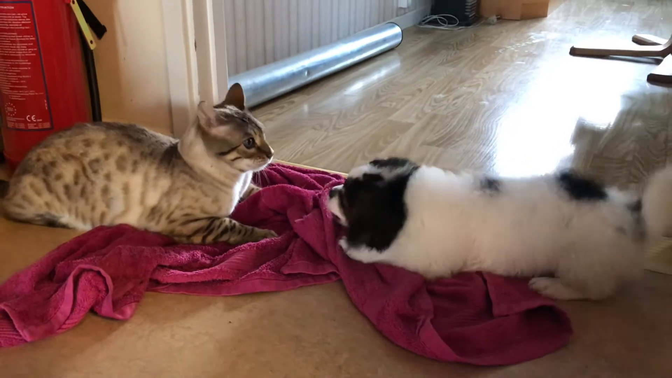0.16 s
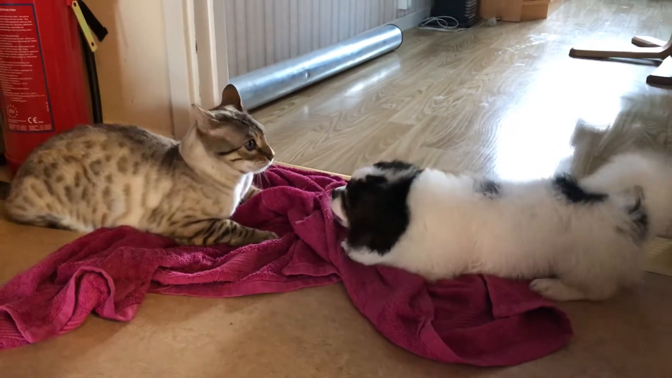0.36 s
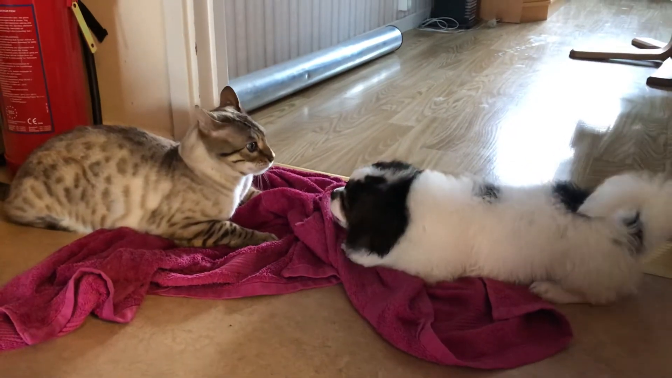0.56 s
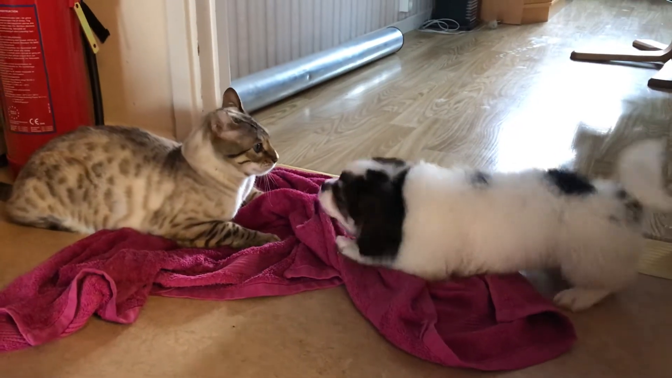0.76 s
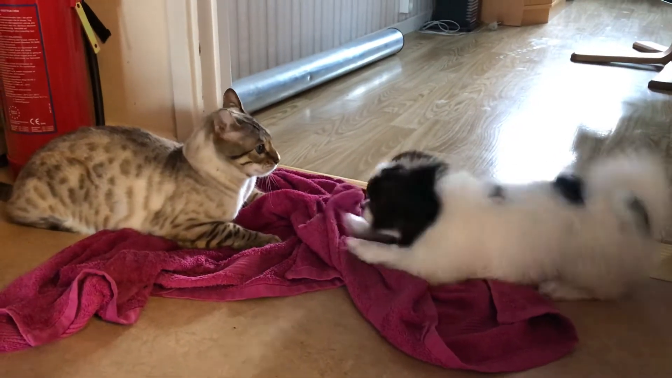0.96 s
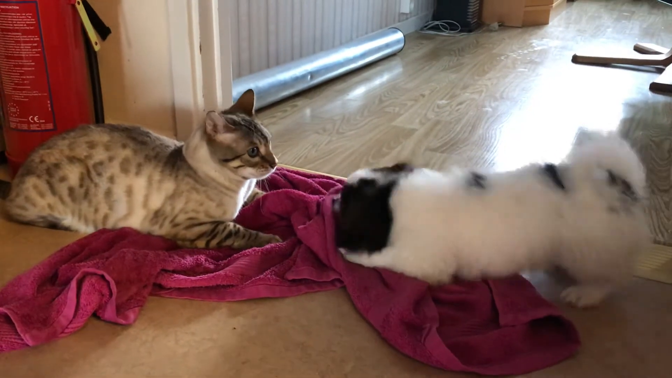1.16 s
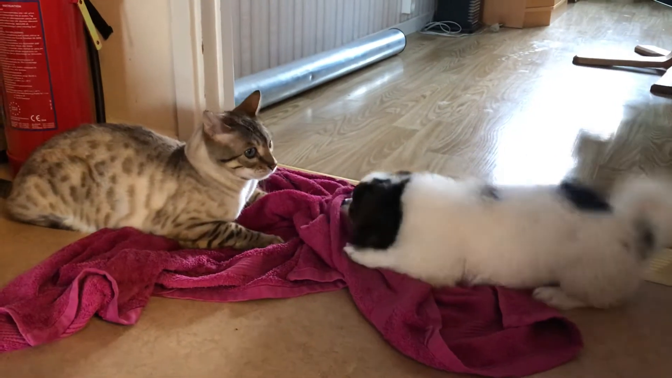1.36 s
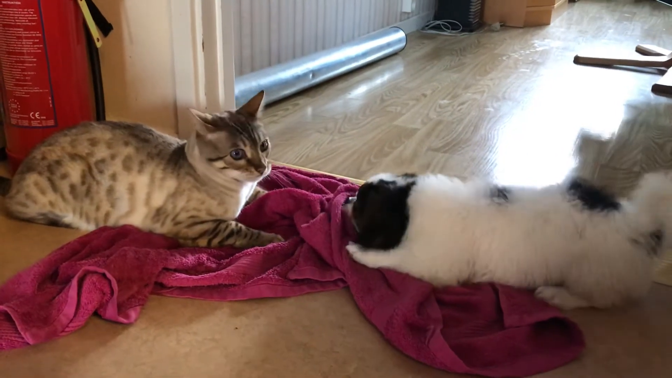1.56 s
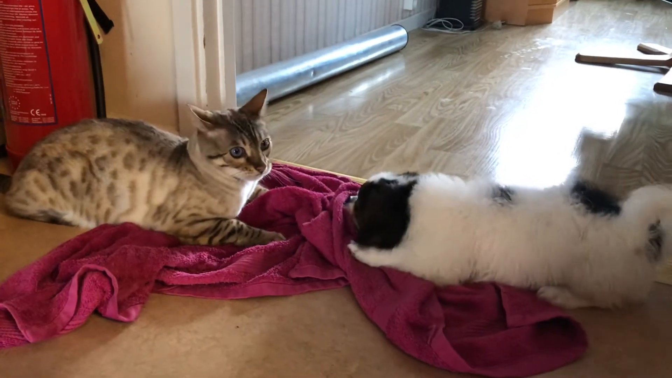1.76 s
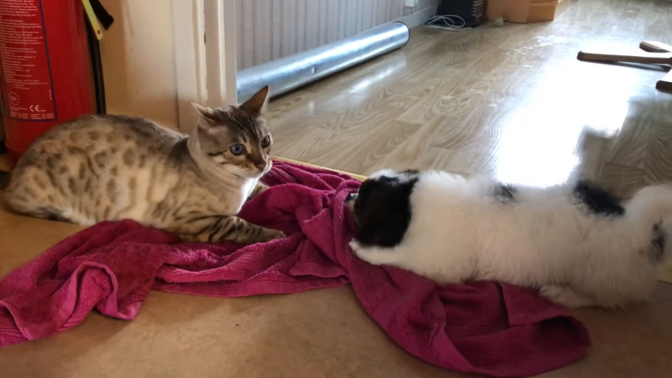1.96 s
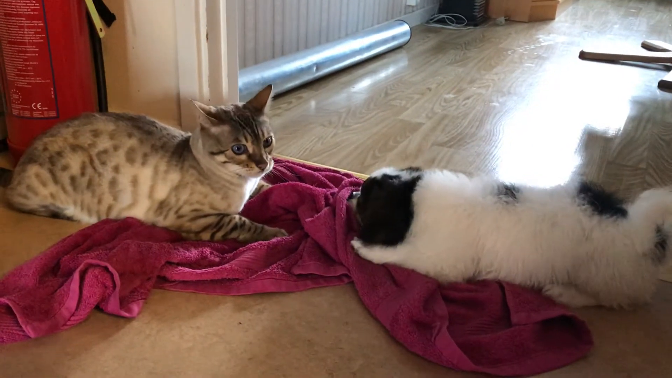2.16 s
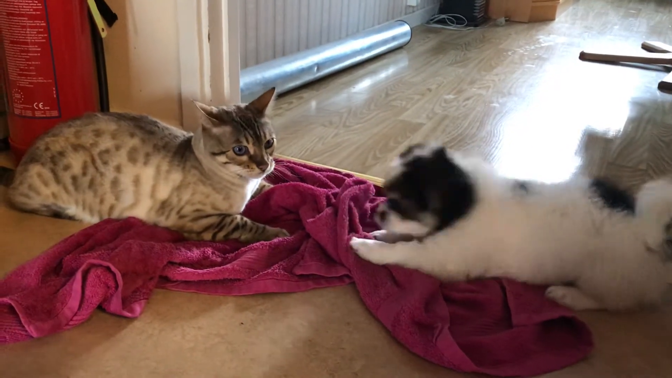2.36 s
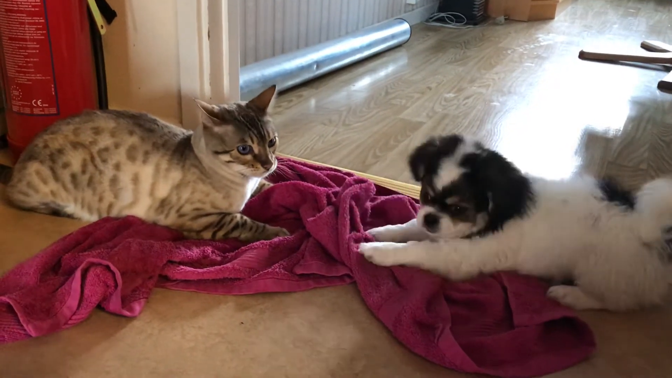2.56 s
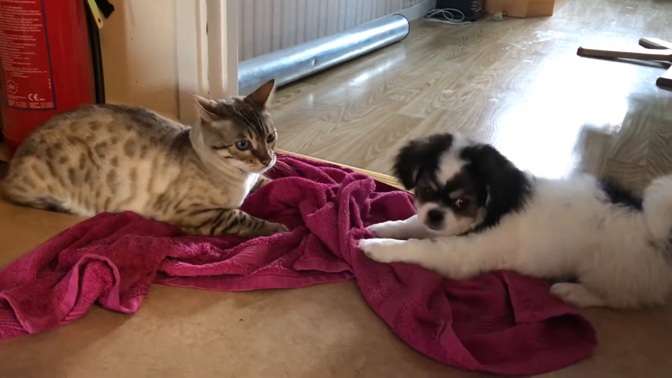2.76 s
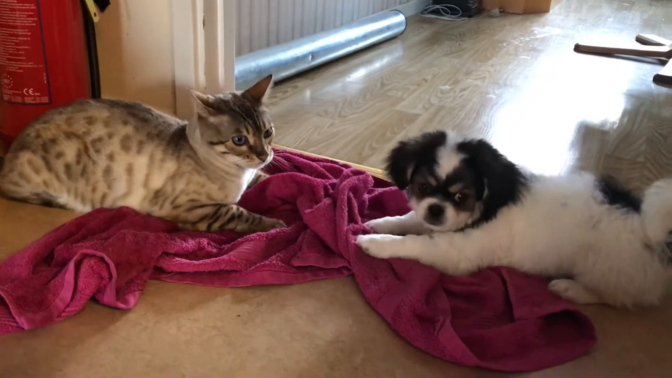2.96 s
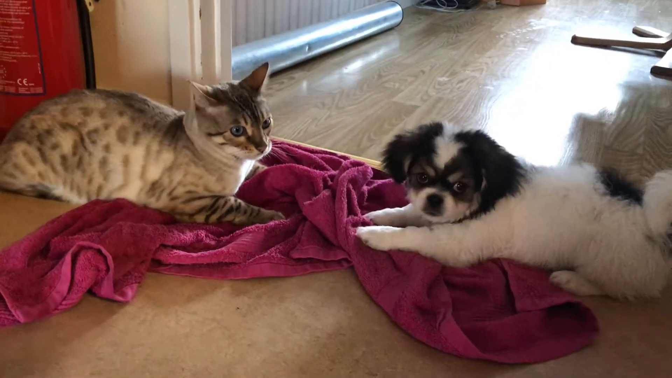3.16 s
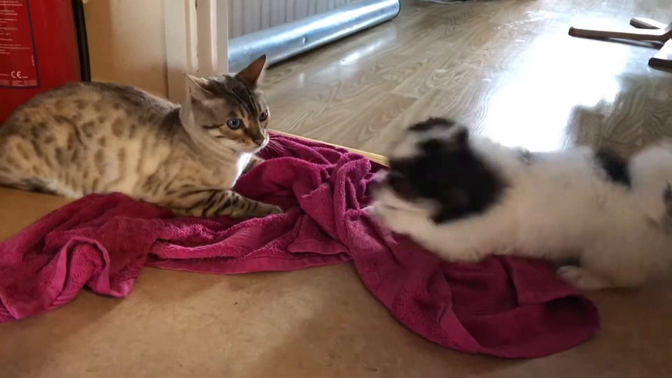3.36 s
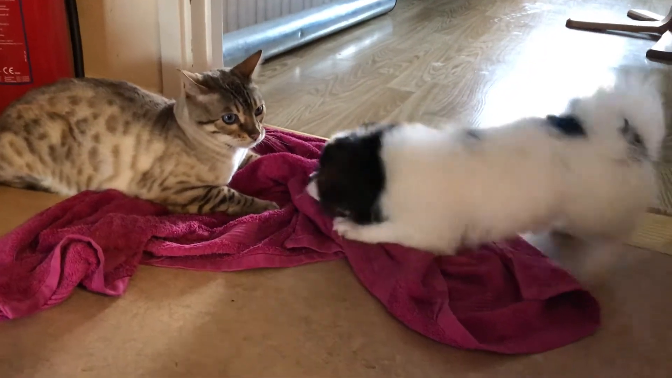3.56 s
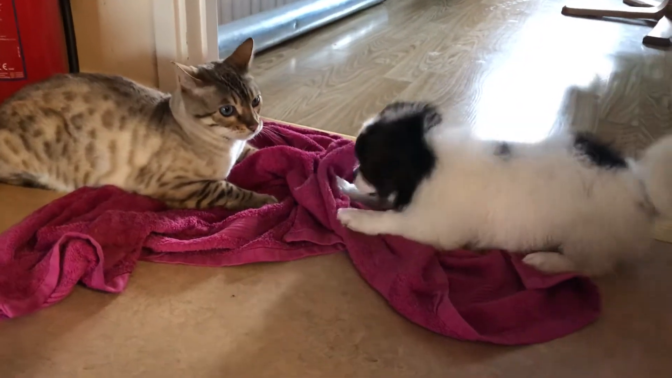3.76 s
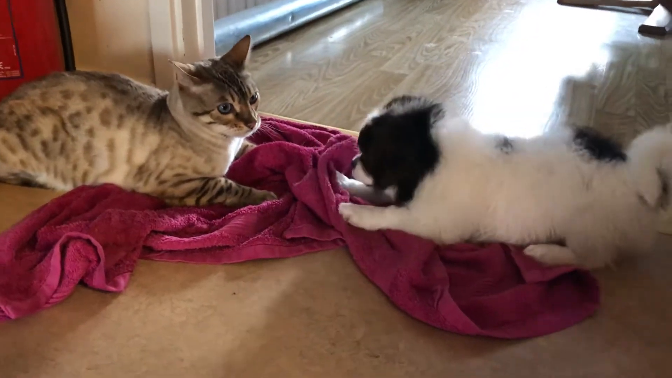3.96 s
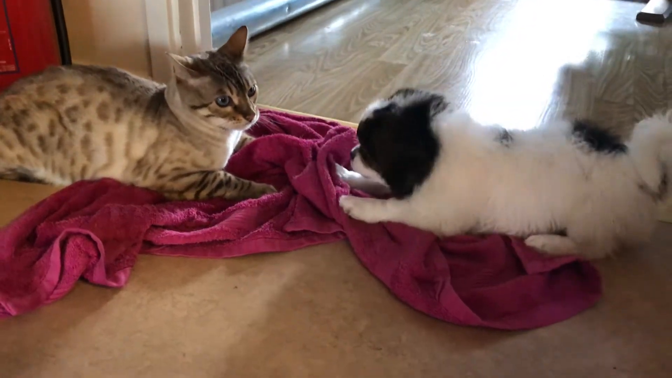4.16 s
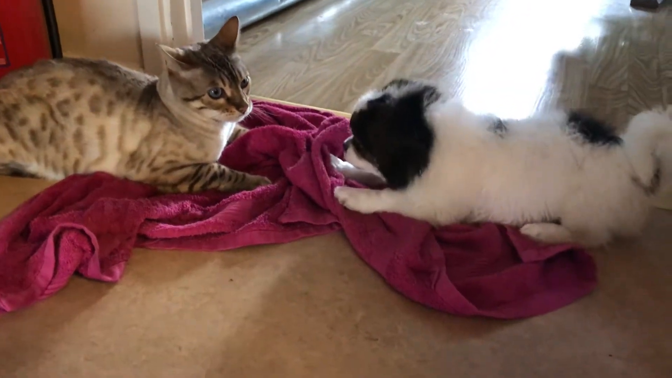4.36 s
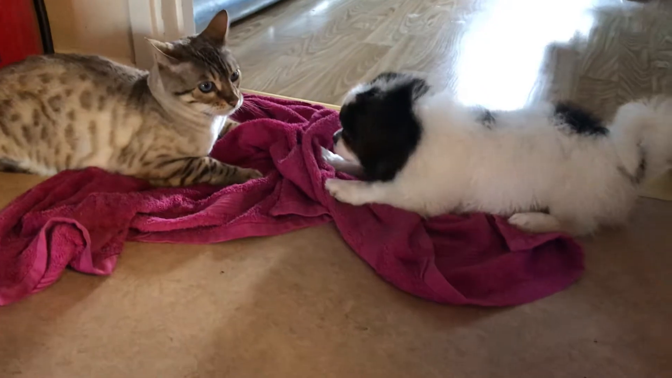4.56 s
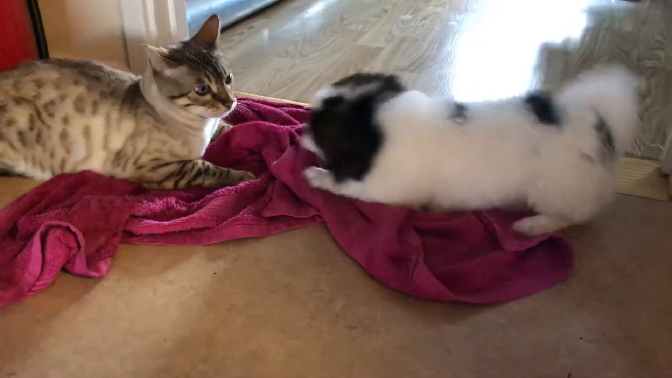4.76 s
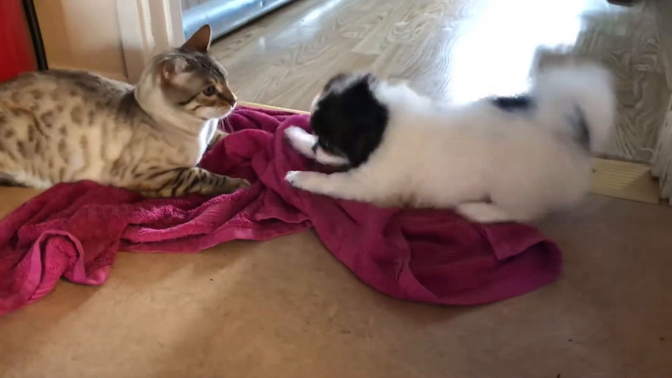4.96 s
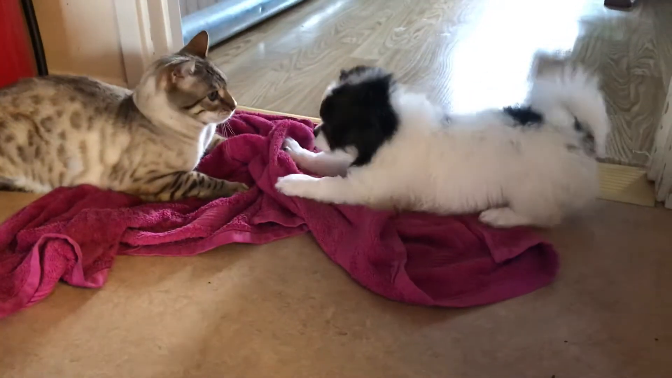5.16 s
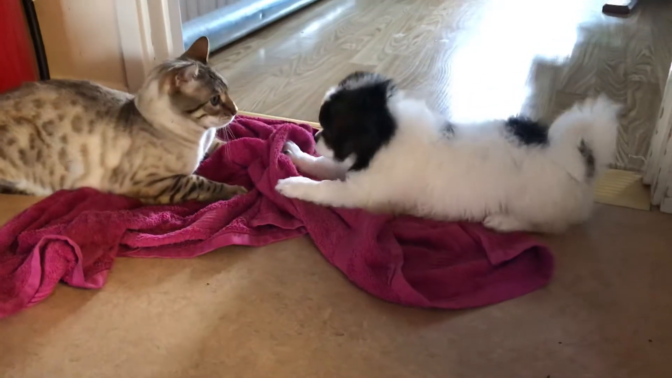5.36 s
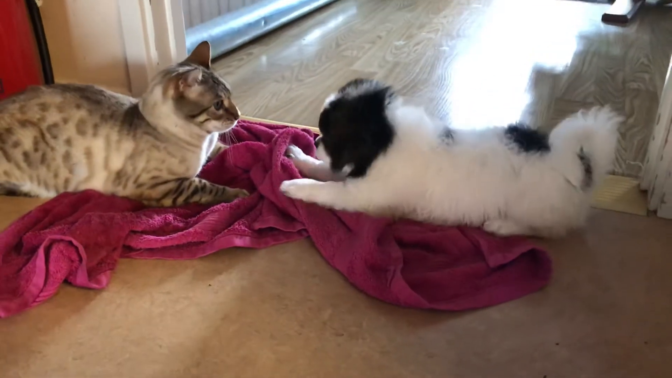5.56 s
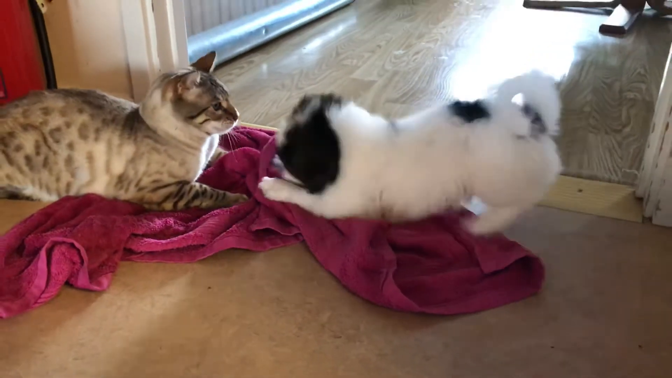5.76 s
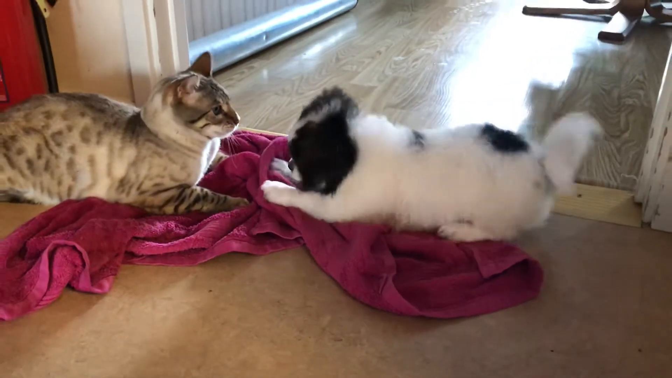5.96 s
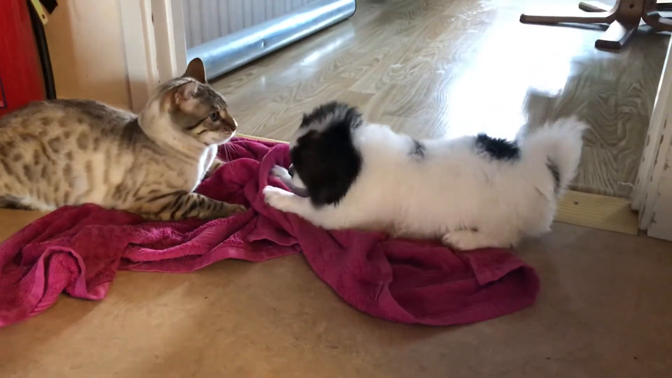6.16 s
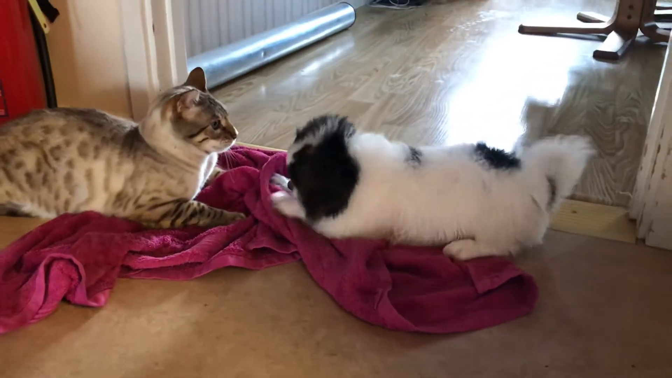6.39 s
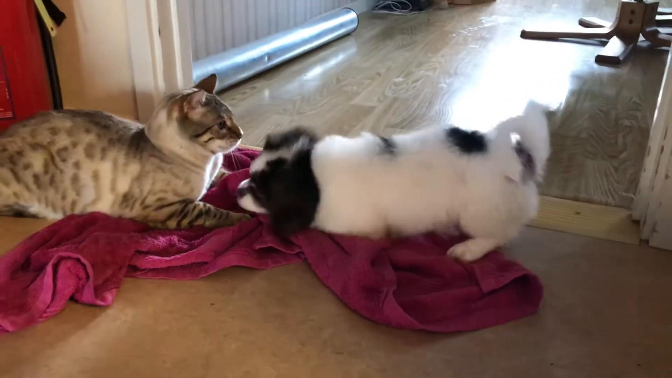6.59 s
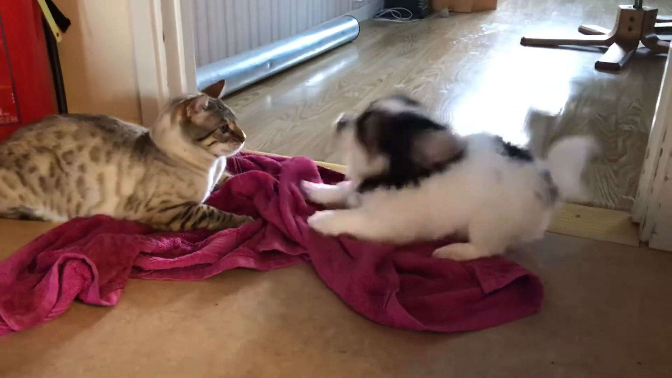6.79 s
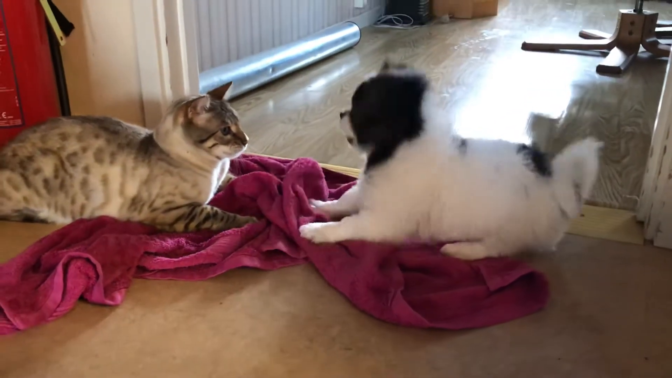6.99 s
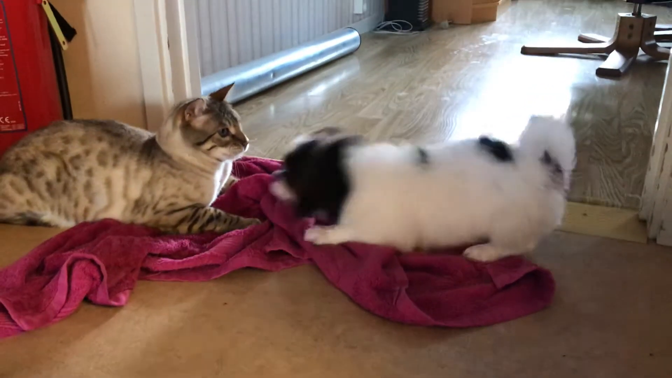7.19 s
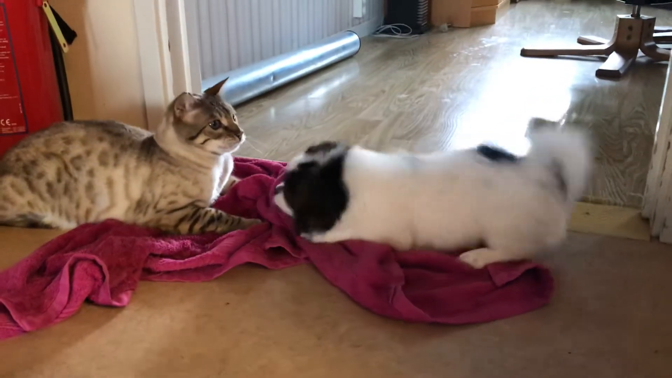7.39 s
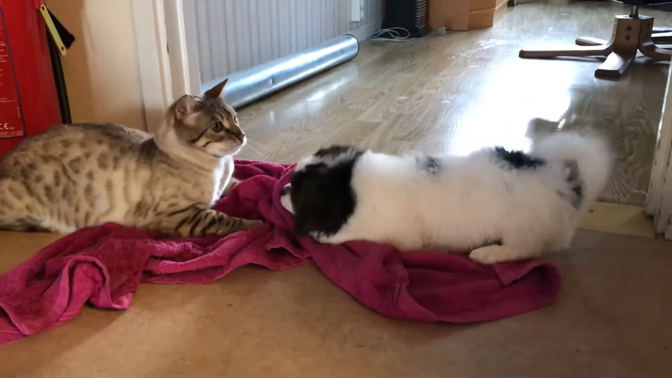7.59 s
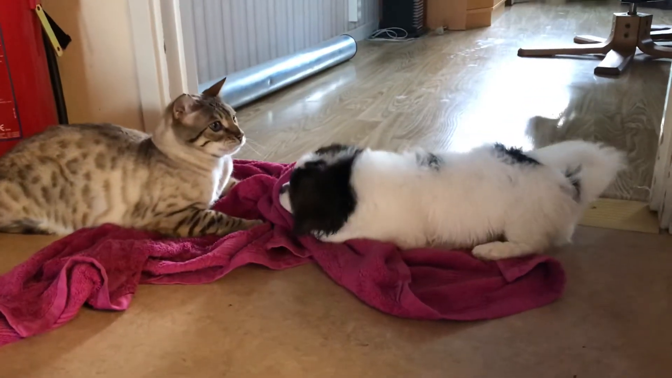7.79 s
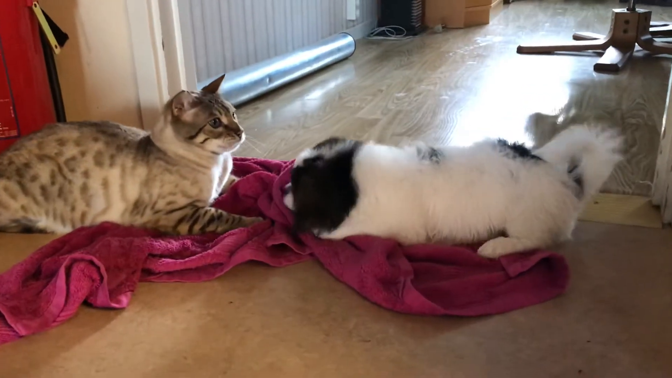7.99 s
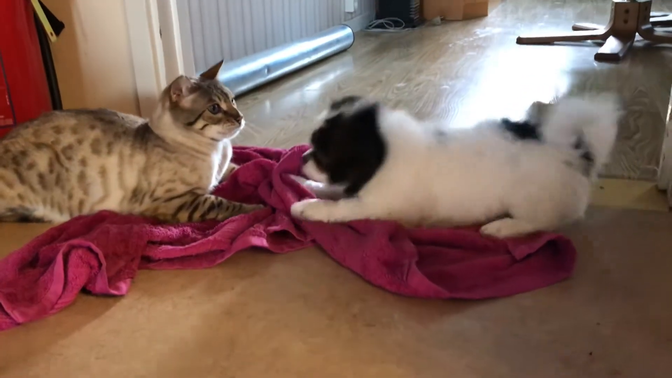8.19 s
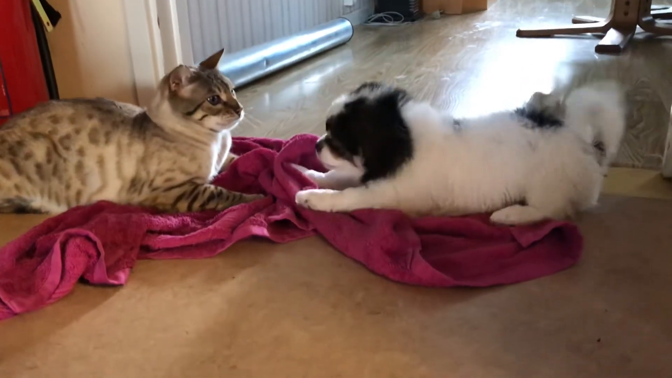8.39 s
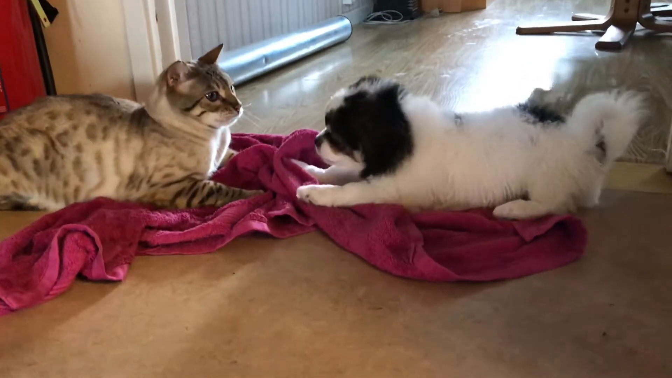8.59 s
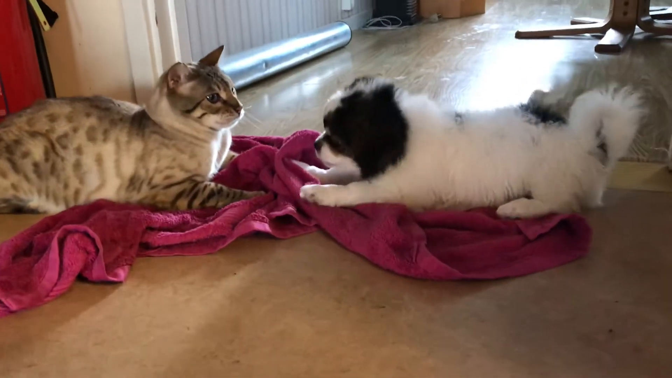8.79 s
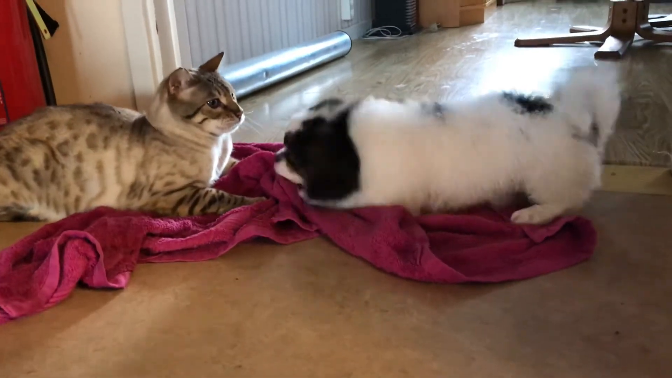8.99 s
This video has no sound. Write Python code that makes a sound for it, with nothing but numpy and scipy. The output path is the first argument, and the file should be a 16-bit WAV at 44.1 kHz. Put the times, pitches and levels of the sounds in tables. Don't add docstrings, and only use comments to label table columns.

```python
import sys
import numpy as np
from scipy import signal
from scipy.fft import rfft, irfft, next_fast_len
from scipy.io import wavfile
from scipy.ndimage import uniform_filter1d

SR = 44100
rng = np.random.default_rng(int(sys.argv[2]) if len(sys.argv) > 2 else 0)


def wav_record(signal):
    frames = np.transpose(np.atleast_2d(signal))
    bounded = np.clip(frames, -1, 1)
    quanta = np.round(bounded * 32767).astype(np.int16)
    wavfile.write(sys.argv[1], SR, quanta)


def gain_from_db(level_db):
    decades = np.asarray(level_db, float) / 20
    return 10 ** decades


N = 398663

# (frequency [Hz], level [dB per Hz])
FLOOR = [(25, -32.5), (70, -19.5), (107, -9), (220, -15.5), (324, -18.5), (1100, -23), (3300, -38),
         (15800, -48.5)]
# (frequency [Hz], width [Hz], level [dB])
HUM = [(103, 27, -65.5), (278.6, 14, -71), (268, 70, -68), (369.7, 33, -72.5), (643.3, 56, -71.5),
       (850, 10, -84), (1107, 9.1, -77.5)]
# (frequency [Hz], level [dB], drift [Hz])
MOTOR = (273.6, -68, 1.5)
# (start [s], length [s], level [dB])
HISS_BOUTS = [(0, 0.16, -59), (.75, 0.14, -62.5), (0.949, 0.37, -64.5), (1.552, 0.34, -75.5), (3.55, 0.37, -66),
              (3.999, 0.31, -71.5), (4.38, .2, -68), (4.796, 0.39, -68.5), (5.86, .11, -65), (6.68, .05, -70),
              (7.252, 0.74, -68.5), (8.099, 0.13, -63.5)]
# (frequency [Hz], level [dB per Hz])
HISS_COLOUR = [(410, -24), (700, -4), (1950, -6), (2280, -3.5), (4350, -11.5), (5790, -13), (12500, -16.5),
               (15500, -20)]

# (frequency [Hz], time to fade by 60 dB [s], level [dB])
ROOM = [(200, .2, -6), (450, 0.45, -4.5), (1000, 0.41, -5.5), (1974, 0.55, 1), (3970, 0.39, 0),
        (9030, 0.18, 1.5)]
# (delay [s], level [dB])
ECHOES = [(.004, -14.5), (.011, -12.5)]
# (delay [s], level [dB])
FAR_WALL = [(.052, -23.5), (.088, -22)]
# (time [s], level sent into the room [dB])
FACING = [(-.1, 0.1), (.6, 0.1), (1.1, 0.1), (3.4, -1.5), (4.8, -1.1), (5.5, 0.1), (6.4, -1.5), (7.1, -1.5),
          (8.0, 0.1), (8.8, 0.1)]
# (lowest [Hz], highest [Hz])
MIC_HZ = (45, 16000)

# (time [s], peak [dB], pitch [Hz])
KNOCKS = [
    (1.859, -60, 964),
    (1.938, -44, 882),
    (3.359, -56, 987),
    (4.129, -52, 950),
    (6.719, -64, 888),
]
# (time [s], peak [dB], pitch [Hz])
THUMPS = [(0.12, -36.5, 145), (1.386, -36, 156), (3.514, -38, 210), (3.732, -39, 120), (4.283, -46, 98.4),
          (5.019, -31, 147), (5.074, -29, 220), (5.902, -30.5, 112), (6.6, -33, 200), (6.765, -36.5, 87.5),
          (7.177, -47, 190), (7.44, -37.5, 84.5), (8.19, -36, 200)]
# (time [s], peak [dB], pitch [Hz], scrape length [s])
TICKS = [(0.1342, -27, 11200, 0.01), (0.7935, -24, 4100, 0.01), (0.9892, -39.5, 10830, 0.0058),
         (1.3941, -24, 9250, 0.01), (2.9336, -54.5, 5300, 0.0082), (3.375, -47.5, 5970, 0.013),
         (3.4648, -42.5, 4140, 0.014), (3.5213, -16.5, 6600, 0.0075), (3.7339, -30.5, 8520, 0.0086),
         (4.6691, -50, 3975, 0.01), (4.947, -40.5, 5170, 0.01), (5.0225, -21.5, 8700, 0.0091),
         (5.0963, -44, 5600, 0.01), (5.902, -25.5, 8470, 0.01), (6.768, -40, 6000, .005),
         (6.773, -26, 9800, 0.012), (6.788, -44, 9000, .01), (7.0204, -42.5, 6300, 0.01),
         (7.205, -49, 8540, 0.02), (7.449, -47.5, 8000, 0.008), (7.438, -39.5, 4080, 0.013),
         (7.9214, -47, 4190, 0.012), (8.0693, -43.5, 3000, 0.013), (8.332, -60, 4510, 0.01),
         (8.9008, -52, 4730, 0.013)]
# (start [s], length [s], level [dB], frequency [Hz], width [Hz])
SCUFFS = [
    (2.348, 0.16, -63.5, 2456, 6000),
    (3.395, 0.02, -61.5, 3870, 900),
    (3.454, 0.038, -49.5, 3860, 1000),
    (3.455, 0.037, -55, 1600, 700),
    (4.791, 0.052, -60, 4500, 7000),
    (6.349, 0.037, -74.5, 4300, 900),
    (7.042, 0.027, -63, 2400, 500),
    (7.126, 0.038, -62, 2290, 500),
    (4.902, 0.026, -50, 2800, 300),
    (5.10, 0.045, -58.5, 5450, 1500),
]
# (start [s], length [s], level [dB], frequency [Hz], width [Hz])
PUFFS = [
    (6.575, .075, -60, 8300, 1400),
    (6.58, .08, -63, 11000, 1800),
    (6.55, .075, -62, 13500, 1200),
    (6.538, .014, -58, 7600, 3000),
    (4.902, .03, -60, 4300, 500),
    (5.088, .05, -56, 3050, 450),
    (7.275, .05, -49, 4600, 700),
]

# (time [s], level [dB], mouth resonance [Hz], pulse rate [per s], unevenness [share])
GROWL = [
    (4.897, -33, 760, 240, .07),
    (4.945, -35.5, 790, 210, .22),
    (4.990, -33.5, 750, 200, .35),
    (5.066, -48, 800, 170, .4),
    (5.070, -35, 1200, 240, .3),
    (5.105, -33, 1230, 240, .3),
    (5.140, -35, 1210, 230, .25),
    (5.150, -45, 800, 160, .4),
    (5.400, -64, 732, 100, .4),
]
# (frequency [Hz], width [Hz], level [dB])
GROWL_THROAT = [(290, 260, 1.1), (950, 400, -7), (1550, 500, -9.5), (2050, 450, -13), (2950, 350, -15),
                (4200, 600, -24)]
# (time [s], peak [dB])
CREAKS = [(5.158, -33), (5.201, -37), (5.208, -37), (5.227, -33), (5.234, -36), (5.241, -36), (5.263, -37),
          (5.275, -41), (5.294, -39), (5.32, -38), (5.331, -39), (5.358, -41)]

# (time [s], first, second, third, fourth resonance [Hz])
SHAPE = [(-.1, 980, 1500, 2250, 3500), (.6, 1050, 1600, 2350, 3110), (1.1, 910, 1440, 2320, 3150),
         (3.4, 955, 1800, 2410, 2960), (5.5, 1016, 1790, 2320, 3163), (6.4, 895, 1450, 2530, 3300),
         (7.1, 1113, 1500, 2305, 3330), (8.0, 954, 1540, 2680, 3500), (8.8, 1013, 1700, 2550, 3110)]
# (time [s], fifth [Hz], sixth [Hz], sixth level [dB])
TEETH = [(-.1, 4400, 5400, -30), (.6, 4000, 4850, -25), (1.1, 4050, 4800, -29), (3.4, 4150, 4900, -28),
         (5.5, 3900, 5200, -28), (6.4, 3900, 4900, -30), (7.1, 4000, 5100, -28), (8.0, 3900, 4500, -30),
         (8.8, 4150, 5000, -30)]
# (width [Hz], ...)
WIDTHS = [420, 750, 620, 460, 750, 900]
# (level [dB], ...)
UPPER_DB = (-10, -10, -13, -21)
TONGUE_SHARE = (1.3, -.7)
# (frequency [Hz], width [Hz], level [dB])
WINDPIPE = (376, 354, -13)
# (frequency [Hz], width [Hz], level [dB])
AIR = [(8964, 1200, 4), (11130, 2500, 2), (13500, 3000, 3)]
# (time [s], tongue [dB], muzzle [dB], lips [dB], air hiss [dB])
POSTURE = [(-.1, -2.1, -2.5, -1.1, -33), (.6, 5, 2.5, 7, -34), (1.1, 4.5, -.6, -1.1, -48),
           (3.4, 1.5, -.6, -2.5, -40), (5.5, -.6, 7.5, 4.5, -30.5), (6.4, -3.5, 0.1, -1.1, -45),
           (7.1, -4, -5, 5, -37), (8.0, -4, -.6, 0.6, -39), (8.8, -.3, -2.5, -9, -29.5)]
# (time [s], pitch unsteadiness [factor], rasp [dB])
HOARSENESS = [(-.1, 2.6, -8), (.6, 1.4, -12.5), (1.1, 1.8, -3), (3.4, 1.5, -6.5), (5.5, 1.6, -8.5),
              (6.4, 2.2, -10.5), (7.1, 1.9, -10), (8.0, 1.5, -12), (8.8, 1.597, -10.5)]

# (start [s], length [s], first pitch [Hz], last pitch [Hz], level [dB])
OPENING = [(.733, .034, 380, 540, -20), (1.238, .03, 435, 520, -19.5), (3.537, .035, 426.6, 525, -18.5),
           (5.646, .052, 260, 410, -27), (5.692, .035, 410, 370, -25), (6.510, .052, 265, 400, -26.5),
           (7.219, .038, 259.6, 430.5, -27.5), (8.080, .048, 250, 430, -26), (8.941, .026, 280, 420, -23)]
CLEAR = [(.012, .048, 700, 735, -22.5), (.762, .062, 770, 860, -14.5), (1.260, .052, 775, 860, -17.5),
         (3.566, .045, 795, 900, -9.5), (5.714, .074, 800, 785, -16.5), (7.280, .020, 790, 830, -19),
         (8.980, .044, 812, 824, -12.5)]
# a loud, nearly pure yelp; the rows at 5.655 and 7.241 s are
YELP = [(-.02, .045, 1010, 940, -19), (.038, .018, 880, 800, -19), (.056, 0.013, 1080, 1070, -14.5),
        (.808, .027, 1000, 1010, -7), (7.302, .025, 1055, 1020, -9.5), (7.320, .024, 980, 780, -15.5),
        (7.284, .027, 800, 1060, -12.5), (6.554, .048, 890, 825, -16), (8.116, .027, 850, 953, -14.5),
        (8.140, .02, 963, 930, -13.5), (8.161, .034, 950, 690, -18), (1.297, .027, 860, 905, -10),
        (3.550, .02, 970, 880, -14.5), (5.655, .043, 760, 1230, -20.5), (5.692, .043, 1250, 1100, -13),
        (6.543, 0.014, 990, 940, -20), (8.109, .013, 1000, 1022, -19), (7.241, .039, 780, 1230, -14),
        (8.963, .019, 1180, 1220, -12.5), (9.018, .034, 830, 885, -10.5), (.748, .018, 980, 1120, -10.5)]
HOARSE = [(-.060, .130, 978, 883.9, -18.5), (.010, .095, 819.6, 750, -23), (.800, .075, 1000, 894.6, -18.5),
          (1.305, .075, 898.6, 850, -19), (3.545, .035, 980, 900, -17), (3.590, .085, 980, 900, -13.5),
          (5.690, .070, 1103, 1000, -26), (5.730, .085, 830, 760, -26), (6.535, .090, 974, 891.7, -24),
          (7.245, .055, 1100, 1099, -20.5), (7.295, .055, 1000, 950.6, -20),
          (8.100, .095, 884.8, 950.4, -20), (8.960, .050, 1094, 1054, -13.5), (9.015, .05, 880, 900, -22)]
RASP = [(-.03, .15, 720, 700, -23), (.795, .075, 850, 800, -21), (1.29, .08, 880, 800, -23),
        (3.585, .09, 900, 880, -18), (5.645, .05, 620, 640, -39), (5.71, .10, 800, 790, -24.5),
        (6.53, .11, 850, 830, -26), (7.24, .05, 800, 810, -24), (7.285, .065, 760, 750, -22),
        (8.095, .10, 900, 860, -24.5), (8.96, .04, 850, 860, -21.5), (9.01, .05, 700, 720, -23)]
CLOSING = [(.070, 0.031, 500, 323.5, -32.5), (.855, 0.045, 382.4, 360, -31), (1.350, .052, 420, 329, -32),
           (3.648, .045, 420, 250, -36), (5.790, 0.07, 400, 220, -33.5), (6.603, .035, 380, 335, -29),
           (7.345, 0.039, 404, 358, -34.5), (8.174, 0.034, 401, 338, -29.5)]
MOAN = [(1.178, .066, 225, 185, -37)]
WHISTLES = [(5.726, .034, 3150, 3200, -23), (.824, .03, 3080, 3020, -30), (8.99, .032, 2450, 2470, -26),
            (5.762, .04, 3150, 3050, -33), (5.72, .02, 3600, 3550, -36), (7.258, .014, 4100, 4200, -36),
            (7.274, .024, 4000, 3950, -31), (7.308, .02, 3680, 3550, -33), (6.545, .05, 2450, 2560, -33),
            (6.60, .028, 2480, 2520, -37), (8.11, .03, 2700, 2780, -33), (3.60, .04, 1950, 2050, -29),
            (3.61, .04, 2900, 2900, -33)]
# (notes, roughness [0-1], pitch jitter [share], harmonic slope [power], brightness [dB],
# brightness per effort [dB per dB], jaw damping [dB], swell [dB per octave of glide], lateness of a rise [power])
REGISTERS = [
    (OPENING, 0.24, .014, .06, -3, .9, -1.1, 26, 1.1),
    (CLEAR, .09, .010, 0.35, 1.5, -.5, -1, 36, 1.9),
    (YELP, .17, .012, 1.2, -5.5, .9, -1, 24, 1.2),
    (HOARSE, 0.69, .04, 0.6, 2.2, .9, -1, 20, 1.2),
    (RASP, .85, .05, .2, 18, .3, -1, 0.1, 1.2),
    (CLOSING, 0.27, .03, 1.3, -1.1, .9, -17, -4.5, 1.2),
    (MOAN, .03, .004, 3.5, -6, .9, -32, 0.1, 1.2),
]


def evened(x):
    return x / np.sqrt(np.mean(x ** 2) + 1e-20)


def read(points, hz):
    f, value = np.transpose(points)
    return np.interp(np.log(hz + 1), np.log(f + 1), value)


def add(mix, s, sound):
    at = round(s * SR)
    sound = sound[max(-at, 0):]
    part = mix[max(at, 0):][:len(sound)]
    part += sound[:len(part)]


def resonate(x, hz, width, order=2):
    turn = np.exp(2j * np.pi * np.cumsum(hz * np.ones(len(x))) / SR)
    r = np.exp(-np.pi * width / SR)
    z = x / turn
    for _ in range(order):
        z = signal.lfilter([1 - r], [1, -r], z)
    return 2 * (turn * z).real


def wander(size, seconds):
    span = max(round(seconds * SR), 1)
    return evened(uniform_filter1d(uniform_filter1d(rng.standard_normal(size), span), span))


def coloured(spectrum, patchy_db):
    a, b, patches = rng.standard_normal((N // 256 + 5, 513, 3)).T
    patches = evened(uniform_filter1d(uniform_filter1d(patches, 10, 0), 12, 1))
    colour_db = read(spectrum, np.fft.rfftfreq(1024, 1 / SR))[:, None] + patchy_db * patches
    noise = signal.istft((a + 1j * b) * gain_from_db(colour_db), nperseg=1024, noverlap=768)[1]
    return evened(noise[:N])


def no_bass(x, hz):
    return signal.sosfilt(signal.butter(2, hz, "highpass", fs=SR, output="sos"), x)


def appliance():
    size = next_fast_len(N)
    bins = np.fft.rfftfreq(size, 1 / SR)
    power = sum(gain_from_db(db) ** 2 / w / (1 + (2 * (bins - f) / w) ** 2) ** 2 for f, w, db in HUM)
    power = power * 2 * SR / np.pi
    hum = irfft(rfft(rng.standard_normal(size)) * np.sqrt(power), size)[:N]
    hz, db, drift = MOTOR
    level = gain_from_db(db + 1.5 * wander(N, .08)) * np.sqrt(2)
    line = level * np.sin(2 * np.pi * np.cumsum(hz + drift * wander(N, .1)) / SR)
    return hum + line


def swelling_hiss():
    still_db, stir_db_per_s, settle_db_per_s = -83, 89.5, 131.5
    t = np.arange(0, N + 256, 256) / SR
    s, length, db = np.transpose(HISS_BOUTS)[:, :, None]
    before, after = np.maximum(s - t, 0), np.maximum(t - s - length, 0)
    bouts_db = db - stir_db_per_s * before - settle_db_per_s * after
    gain = np.sqrt(gain_from_db(still_db) ** 2 + (gain_from_db(bouts_db) ** 2).sum(0))
    return np.interp(np.arange(N) / SR, t, gain) * gain_from_db(6.5) * coloured(HISS_COLOUR, 2.0)


def background():
    return gain_from_db(-62) * coloured(FLOOR, 1.2) + appliance() + swelling_hiss()


def room_tails():
    taps = np.zeros((3, SR))
    at = np.arange(300, SR - 20, 20)
    shape = (len(taps), len(at))
    places = at + rng.integers(0, 20, shape)
    np.put_along_axis(taps, places, rng.choice([-1., 1.], shape), axis=1)
    hz, t, z = signal.stft(taps, SR, nperseg=256)
    t60, colour_db = (read(np.array(ROOM)[:, [0, k]], hz)[:, None] for k in (1, 2))
    tails = signal.istft(z * gain_from_db(colour_db - 60 * t / t60), SR, nperseg=256)[1]
    return tails * gain_from_db(-12.5) / np.linalg.norm(tails, axis=1, keepdims=True)


def room(x):
    sway_per_s = 9.3
    tails = room_tails()
    early = np.zeros(SR // 4)
    for s, db in ECHOES:
        add(early, s, gain_from_db([db]))
    for s, db in FAR_WALL:
        add(early, s, gain_from_db(db) * signal.firwin(41, 1800, fs=SR))
    s, db = np.transpose(FACING)
    clock = np.arange(N) / SR
    sent = x * gain_from_db(db[np.searchsorted(s, clock) - 1])
    thirds = np.arange(3)[:, None] / 3
    sway = np.sqrt(2 / 3) * np.cos(2 * np.pi * (sway_per_s * clock + thirds))
    echoes = signal.fftconvolve(sent, early)[:N]
    ringing = signal.fftconvolve(sent * sway, tails, axes=1)[:, :N].sum(0)
    return x + echoes + ringing


def paws():
    out, t = np.zeros(N), np.arange(6000) / SR
    for s, db, hz in THUMPS:
        push = np.sin(2 * np.pi * hz * t)
        push = push + .5 * evened(resonate(rng.standard_normal(len(t)), 1.6 * hz, 160))
        add(out, s, gain_from_db(db - 60 * t / 0.16) * push * np.minimum(t / 0.0046, 1))
    for s, db, hz, length in TICKS:
        grit = rng.standard_normal(len(t))
        grit = evened(resonate(grit, 9500, 12000)) + 0.31 * evened(resonate(grit, hz, 2600))
        click, scrape = np.exp(-t / 0.0013), np.exp(-t / max(length, 1e-3))
        add(out, s, gain_from_db(db - 7.0) * grit * (click + 0.14 * scrape))
    for s, length, db, hz, width in SCUFFS + PUFFS:
        rub = evened(resonate(rng.standard_normal(max(round(length * SR), 200)), hz, width))
        add(out, s, gain_from_db(db) * rub * signal.windows.tukey(len(rub), .5))
    for s, db, hz in KNOCKS:
        ring = evened(resonate(rng.standard_normal(len(t)), hz, 300))
        add(out, s, gain_from_db(db - 2.5 - 60 * t / 0.12) * ring)
    return out


def growl_throat(drive, mouth_hz):
    size = len(drive)
    voice = gain_from_db(2.5) * resonate(drive, mouth_hz * (1 + .05 * wander(size, .012)), 260)
    for f, w, db in GROWL_THROAT:
        voice += gain_from_db(db) * resonate(drive, f * (1 + .09 * wander(size, .02)), w)
    return no_bass(voice, 150)


def growl():
    s, *columns = np.transpose(GROWL)
    t = np.arange(s[0], s[-1], 1 / SR)
    level_db, mouth_hz, rate, uneven = (np.interp(t, s, c) for c in columns)
    turns = np.cumsum(rate * np.exp(uneven * wander(len(t), 0.0054))) / SR
    pulses = np.diff(np.floor(turns), prepend=0) * gain_from_db(2.1 * rng.standard_normal(len(t)))
    puffs = (0.2 + np.exp(-(turns % 1) / 0.3)) * rng.standard_normal(len(t))
    creaks = np.zeros(len(t))
    for at, db in CREAKS:
        add(creaks, at - s[0], gain_from_db(db) * (1.45 + .6 * rng.standard_normal(24)) * np.hanning(24))
    drive = evened(uniform_filter1d(pulses, size=12)) + 4.5 * uneven * evened(puffs)
    voice = growl_throat(drive, mouth_hz)
    steady = voice / np.sqrt(uniform_filter1d(voice ** 2, 1500) + 1e-12)
    rumble = gain_from_db(level_db) * steady * signal.windows.tukey(len(t), .008)
    return s[0], rumble + gain_from_db(9.5) * growl_throat(creaks, mouth_hz)


def note(row, rough, jitter, tilt, bright_db, per_effort, shut_db, swell_db, late):
    s, length, first_hz, last_hz, mid_db = row
    u = np.linspace(0, 1, max(round(length * SR), 200))
    size, head_voice = len(u), first_hz > 600
    now = [[p for p in table if p[0] <= s][-1] for table in (SHAPE, POSTURE, HOARSENESS, TEETH)]
    (_, *throat_hz), (_, tongue_db, muzzle_db, lips_db, air_db), (_, unsteady, rasp_db), (_, *teeth_hz, sixth_db) = now

    arch = np.sin(np.pi * u / 2) ** late if last_hz > first_hz else 1 - np.cos(np.pi * u / 2)
    hz = first_hz + (last_hz - first_hz) * arch
    level_db = mid_db + swell_db * np.log2(last_hz / first_hz) * (u - .5)
    turns = np.cumsum(hz * (1 + jitter * unsteady * wander(size, .0015))) / SR
    folds = sum(np.cos(2 * np.pi * k * turns) * k ** -tilt * (k * hz < 5500) for k in range(1, 16))
    puffs = (0.67 + np.exp(-(turns % 1) / 0.44)) * rng.standard_normal(size)
    shimmer = 1 + min(.12 + 1.4 * rough, .7) * np.tanh(wander(size, .0028))
    drive = (1 - rough) * evened(folds) * shimmer + (rough + gain_from_db(rasp_db)) * evened(puffs)

    if rough < 1 / 2 and head_voice:
        throat_hz[0] = throat_hz[0] + 0.57 * (hz - throat_hz[0])
    effort_db = bright_db + per_effort * (level_db - level_db.max())
    effort_db = effort_db - 14 * rough * u
    shifts_db = [*np.multiply(TONGUE_SHARE, tongue_db), muzzle_db, lips_db - 3 * rough]
    upper_db = [db + shift + effort_db for db, shift in zip(UPPER_DB, shifts_db)]
    lift_db = [0, *upper_db, sixth_db + effort_db - 4 * rough]
    mouth = np.zeros(size)
    for k, f in enumerate([*throat_hz, *teeth_hz]):
        ring = resonate(drive, f * (1 + .03 * wander(size, .015)), WIDTHS[k])
        mouth += (-1) ** k * gain_from_db(lift_db[k]) * ring
    pipe_hz, pipe_width, pipe_db = WINDPIPE
    chest = gain_from_db(pipe_db - 6 * head_voice) * resonate(drive, np.minimum(hz, pipe_hz), pipe_width)
    air = np.zeros(size)
    for f, w, db in AIR:
        gust = gain_from_db(db + 4.5 * wander(size, 0.006))
        air += gust * resonate(puffs, f * (1 + .05 * wander(size, .012)), w)
    sound = evened(gain_from_db(shut_db) * mouth - chest) + gain_from_db(air_db + 0.26 * shut_db) * evened(air)
    fade = signal.windows.tukey(size, min(.25 + 0.9 * rough, 1))
    return s, gain_from_db(level_db) * sound * fade


def whistle(length, first_hz, last_hz, db):
    size = max(round(length * SR), 200)
    hz = np.linspace(first_hz, last_hz, size) * (1 + .007 * wander(size, .002))
    swell = gain_from_db(db + 2.5 * wander(size, .003)) * signal.windows.tukey(size, .6)
    return swell * np.sin(2 * np.pi * np.cumsum(hz) / SR)


def yaps():
    out = np.zeros(N)
    for rows, *manner in REGISTERS:
        for row in rows:
            add(out, *note(row, *manner))
    for s, *tone in WHISTLES:
        add(out, s, whistle(*tone))
    return no_bass(out, 170)


def scene():
    dog = yaps() + paws()
    add(dog, *growl())
    return (room(dog) + background())[None]


def low_pass(x):
    return signal.sosfilt(signal.butter(12, 16510, fs=SR, output="sos"), x)


def record(dry):
    limited = 1.308 * np.tanh(dry / 1.33)
    band = signal.butter(4, MIC_HZ, "bandpass", fs=SR, output="sos")
    heard = signal.sosfilt(band, limited)
    return low_pass(heard)


dry = scene()
out = record(dry)
wav_record(out)
```